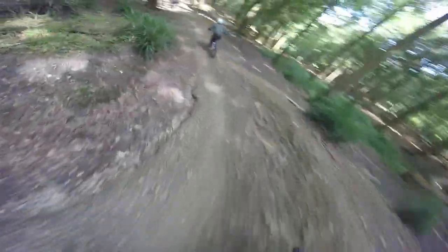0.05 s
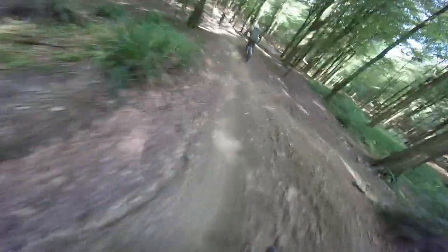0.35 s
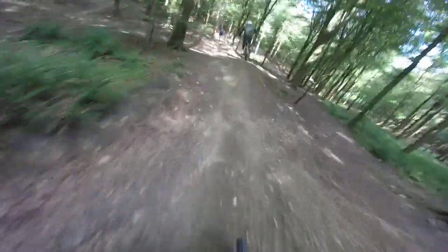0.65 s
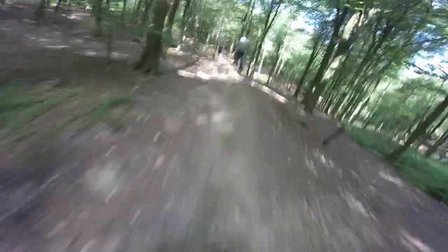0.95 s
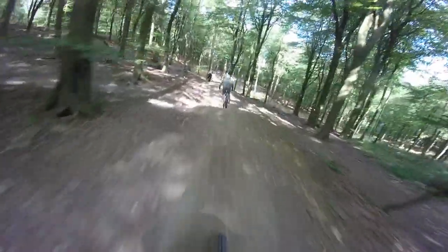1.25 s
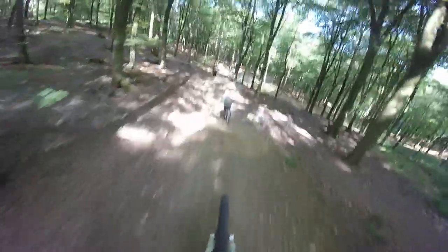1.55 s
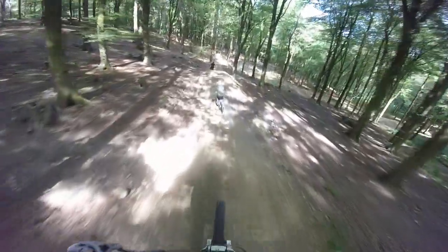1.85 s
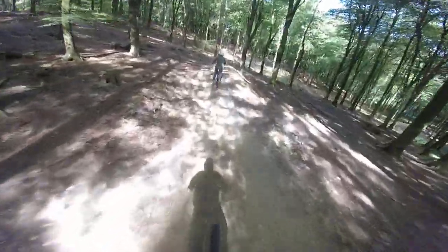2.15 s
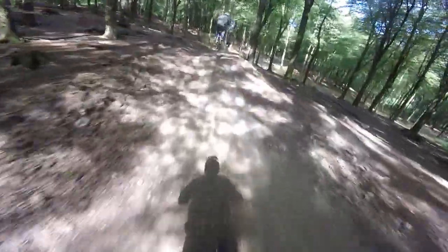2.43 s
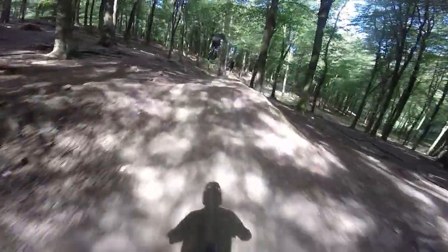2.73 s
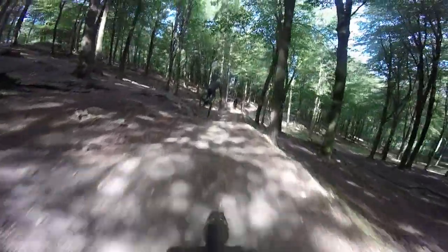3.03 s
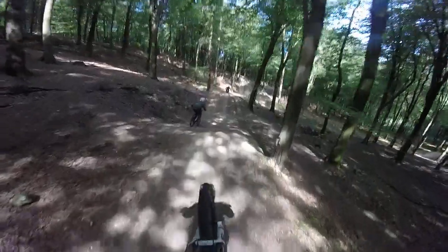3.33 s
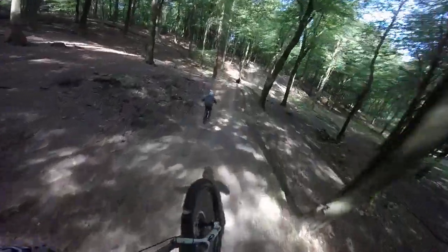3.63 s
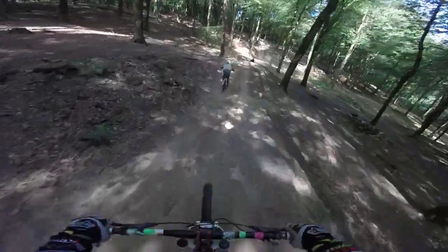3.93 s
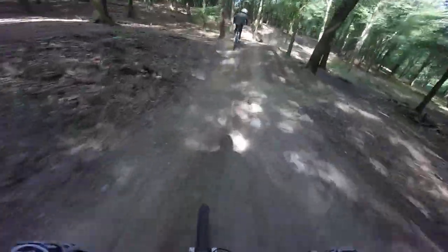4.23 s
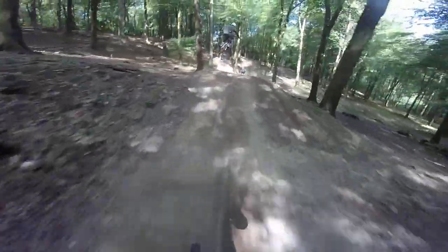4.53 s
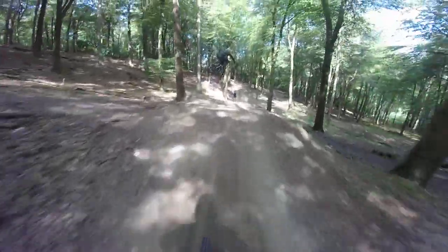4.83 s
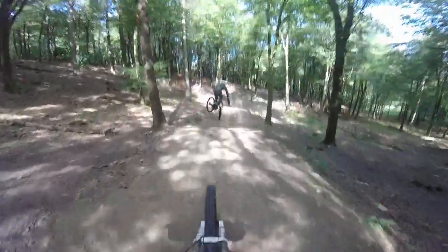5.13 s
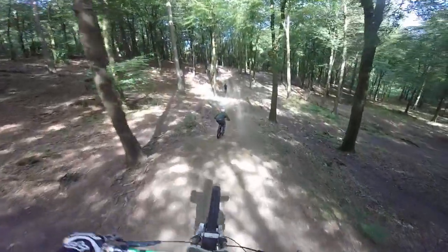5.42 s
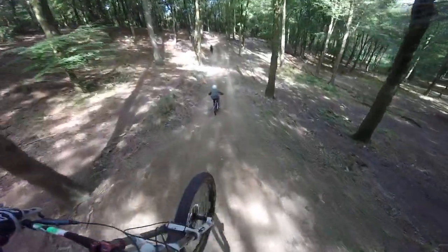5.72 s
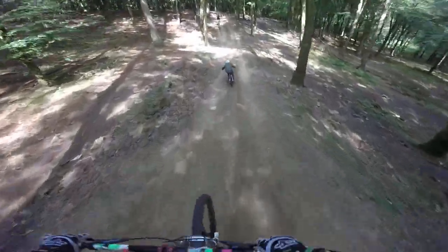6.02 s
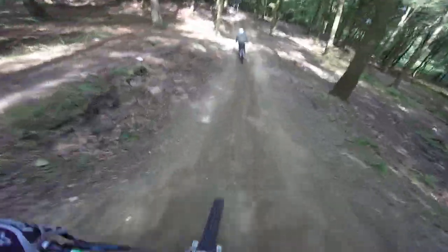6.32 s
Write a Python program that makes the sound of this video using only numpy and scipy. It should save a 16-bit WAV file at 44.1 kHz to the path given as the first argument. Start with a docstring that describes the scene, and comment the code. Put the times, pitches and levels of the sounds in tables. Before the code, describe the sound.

A mountain bike runs along a dirt trail, heard close from a microphone on the rider. Air streams past throughout, with a low rumble on rough ground, tyres rushing over packed dirt, and chain and cables clacking irregularly against the frame. The opening is busy with rattles, and a bump brings a crunch and thump at about 1 second. Near 1.6 seconds the bike takes off and the tyres and rumble ease, leaving wind and scattered clicks. It lands around 2.3 seconds, with a loud, hollow knock and thud at 2.5. A second takeoff at 3.3 seconds gives a smaller thump, then a quieter stretch until a crunching, rattling landing at about 4.2. The tyre rush swells into a third jump at 5.2 seconds, falls away in the air, and returns near 6.3 with a thump, crunching dirt and hard clatter.

```python
"""Mountain bike on three dirt jumps.

Heard from a camera worn by the rider. Air streams past; rough ground and landings shake the camera
into a low rumble. The tyres rush over packed dirt, crunch on loose patches and fall quiet in the air.
Chain and cables clack against the frame on the bumps, and the first landing gives a loud knock."""
import sys
import numpy as np
from scipy import signal
from scipy.fft import rfft, irfft, next_fast_len
from scipy.io import wavfile
from scipy.ndimage import uniform_filter1d, map_coordinates

SR = 44100
rng = np.random.default_rng(int(sys.argv[2]) if len(sys.argv) > 2 else 0)


def log_audio(samples):
    """Write samples as a 16-bit WAV file to the path given in sys.argv[1]."""
    # one column per channel
    frames = np.atleast_2d(samples).T
    # limit to full scale, then quantise
    limited = np.clip(frames, -1, 1)
    pcm = np.round(limited * 32767).astype(np.int16)
    wavfile.write(sys.argv[1], SR, pcm)


N = 285327


def amp(db):
    """Decibels to gain."""
    return 10 ** (np.asarray(db) / 20)


def unit_rms(x):
    """x scaled to rms 1."""
    return x / np.sqrt(np.mean(x ** 2) + 1e-20)


def power_sum(*gains):
    """Unrelated contributions add in power."""
    return np.sqrt(sum(gain ** 2 for gain in gains))


def curve(rows):
    """Time-value rows interpolated to every sample."""
    return np.interp(np.arange(N) / SR, *np.transpose(rows))


def swell(centre_s, sigma_s):
    """Gaussian bell of height 1."""
    return np.exp(-.5 * ((np.arange(N) / SR - centre_s) / sigma_s) ** 2)


def wobble(knots_per_s):
    """Smooth random curve."""
    knots = rng.standard_normal(int(N * knots_per_s / SR) + 4)
    return map_coordinates(knots, [np.arange(N) * knots_per_s / SR])


def peaks_db(hz, resonances):
    """Gain of bell-shaped peaks or dips."""
    return sum(db * np.exp(-.5 * ((hz - centre) / width) ** 2) for centre, width, db in resonances)


def colour_db(hz, spectrum, resonances=()):
    """Spectrum interpolated in log frequency, plus resonances."""
    knot_hz, db = np.transpose(spectrum)
    return np.interp(np.log(hz + 1), np.log(knot_hz), db) + peaks_db(hz, resonances)


def filtered(x, response):
    """x through a frequency response."""
    size = next_fast_len(N + SR // 2)
    return irfft(rfft(x, size) * response(np.fft.rfftfreq(size, 1 / SR)), size)[:N]


def minimum_phase(gain_db):
    """Causal frequency response of a body with this gain."""
    cepstrum = irfft(np.log(amp(gain_db)))
    half = len(cepstrum) // 2
    cepstrum[1:half] *= 2
    cepstrum[half + 1:] = 0
    return np.exp(rfft(cepstrum))


def rush(spectrum, resonances=(), grain_db=0):
    """Coloured noise of rms 1; grain_db breaks it into tiny uneven bursts."""
    drive = rng.standard_normal(N) * amp(grain_db * wobble(900))
    return unit_rms(filtered(drive, lambda hz: amp(colour_db(hz, spectrum, resonances))))


def add_centred(track, centre_s, sound):
    """Mix in a sound with its middle at centre_s."""
    at = round(centre_s * SR) + np.arange(len(sound)) - len(sound) // 2
    inside = (at >= 0) & (at < N)
    track[at[inside]] += sound[inside]


def impact(bounce_s, body_db, vary_db, scrape_db, scrape_t60_s, brush_db, brush_t60_s, rub_cutoff_hz):
    """A brush, a contact at mid-buffer, rebounds and a scrape ring a body; energy of 10 ms at rms 1."""
    size, bounces = 4096, 4
    t, hz = (np.arange(size) - size // 2) / SR, np.fft.rfftfreq(size, 1 / SR)
    bounce_s = np.clip(bounce_s, .0005, .02)
    lead_db = brush_db + 60 * t / brush_t60_s
    tail_db = -60 * t / (scrape_t60_s + 2 * bounce_s)
    rubbing = amp(np.where(t < 0, lead_db, tail_db))
    friction = irfft(rfft(rng.standard_normal(size) * rubbing) / np.hypot(1, (hz / rub_cutoff_hz) ** 2))
    force = amp(scrape_db) * friction / np.linalg.norm(rubbing)
    force[size // 2] += 1
    lag = (np.arange(bounces) + rng.uniform(.2, 1, bounces)) / bounces
    rebounds = amp(-6 - .68 * lag + 2.3 * rng.standard_normal(bounces)) * rng.choice([-1, 1], bounces)
    force[size // 2 + (lag * bounce_s * SR).astype(int)] += rebounds
    # each struck spot favours other frequencies
    spot_db = vary_db * np.interp(hz, np.linspace(0, SR / 2, 48), rng.standard_normal(48))
    sound = irfft(rfft(force) * minimum_phase(body_db(hz) + spot_db))
    return sound / np.linalg.norm(sound) * np.sqrt(SR / 100)


# Air stream strength: time_s, relative_db
AIR_LEVEL = [(0.0, -55), (0.49, -53.5), (0.7, -53.5), (1.17, -52.5), (1.67, -57), (1.98, -57.5),
             (2.34, -48.5), (2.52, -50), (3.77, -56.5), (3.96, -54), (4.18, -50.5), (4.81, -51.5),
             (5.1, -52.5), (5.93, -54), (6.47, -45)]
# Air stream spectrum: freq_hz, gain_db
AIR_SPECTRUM = [(50, -18.5), (70, 11.5), (100, 2), (170, -3.5), (260, -3.5), (320, 0), (400, -8),
                (500, -9.5), (650, -15), (1000, -17.5), (2000, -11.5), (6000, -47)]


def wind():
    """Air streams past the rider in small eddies."""
    eddies_db = 2.4 * wobble(24)
    return amp(curve(AIR_LEVEL) + 4 + eddies_db) * rush(AIR_SPECTRUM)


# Jumps: takeoff_s, touchdown_s, lip_rush_db, landing_rush_db, kick_shake_db, landing_shake_db
JUMPS = [(1.58, 2.335, -43.5, -39.5, -38.5, -21.5), (3.28, 4.143, -43, -41, -22.5, -18.5),
         (5.227, 6.264, -39.5, -36, -31, -23)]
UNLOAD_S, BITE_S = .035, .035


def grounded():
    """1 with the wheels on the dirt, 0 in flight."""
    t = np.arange(N) / SR
    step = lambda u: .5 + .5 * np.tanh(u / 2)
    return 1 - sum(step((t - off_s) / UNLOAD_S) * step((down_s - t) / BITE_S)
                   for off_s, down_s, *_ in JUMPS)


# Trail roughness: time_s, shake_db
TRAIL = [(0, -30), (.4, -25), (.55, -29), (.98, -26), (1.07, -18), (1.2, -34), (1.55, -37), (2.66, -28),
         (2.85, -45), (3.2, -37), (4.45, -32), (5.2, -36.5), (6.47, -25)]
FLIGHT_SHAKE_DB = -48


def shake():
    """Shake strength: the trail, the rear wheel kicking off each lip, the suspension bottoming."""
    kicks = [amp(db) * swell(off_s + .11, sigma_s=.05) for off_s, *_, db, _ in JUMPS]
    landings = [amp(db) * swell(down_s + .145, sigma_s=.055) for _, down_s, *_, db in JUMPS]
    return power_sum(amp(FLIGHT_SHAKE_DB), grounded() * amp(curve(TRAIL)), *kicks, *landings)


# Camera mount sway: freq_hz, gain_db
RUMBLE_SPECTRUM = [(10, -12.5), (20, -7.5), (32, 0.5), (41, -3), (50, -13.5), (68, -12), (82, -24),
                   (105, -35.5), (160, -35.5), (400, -104)]


def rumble():
    """Bumps and buffeting shake the camera on its mount."""
    sway = rush(RUMBLE_SPECTRUM)
    local_rms = np.sqrt(uniform_filter1d(np.abs(signal.hilbert(sway)) ** 2 / 2, size=3000))
    return shake() * amp(.9 * wobble(18) - .07) * sway / local_rms


# Hard bumps: start_s, peak_db, pitch_hz
THUMPS = [(1.046, -21, 69.3), (2.496, -21.5, 60.4), (3.359, -29.5, 61.6), (4.274, -22, 66),
          (6.357, -23.5, 68)]


def thumps(rise_s=.021):
    """Each hard bump swings the mount for a few cycles as the suspension takes the load."""
    track = np.zeros(N)
    for start_s, peak_db, pitch_hz in THUMPS:
        t = np.maximum(np.arange(N) / SR - start_s, 0)
        envelope = t / rise_s * np.exp(1 - t / rise_s)
        track += amp(peak_db) * envelope * np.sin(2 * np.pi * pitch_hz * t)
    return track


# Loose dirt patches: centre_s, level_db, sigma_s
LOOSE_PATCHES = [(.45, -62, 0.021), (1.021, -41, 0.011), (1.59, -49, 0.032), (2.41, -44.5, 0.02),
                 (2.91, -47, 0.036), (4.22, -44, 0.041), (4.92, -50.5, 0.047), (5.5, -52.5, 0.075),
                 (6.29, -47, 0.02), (6.363, -36, 0.017), (6.44, -40, 0.013)]
# Cracking grains: freq_hz, gain_db
CRUNCH_SPECTRUM = [(500, -22), (1300, 3.5), (2000, 3), (3700, -7), (6000, -11), (9000, -28), (15000, -44)]


def crunch(grains_per_s=1800):
    """Crumbs and stones crack under the tread: many tiny grains, a few large ones."""
    envelope = sum(amp(db) * swell(centre_s, sigma_s) for centre_s, db, sigma_s in LOOSE_PATCHES)
    grains = (rng.random(N) < grains_per_s / SR) * rng.choice([-1, 1], N)
    sizes = amp(4.1 * np.minimum(rng.exponential(size=N), 5))
    cracks = filtered(grains * sizes, lambda hz: minimum_phase(colour_db(hz, CRUNCH_SPECTRUM)))
    return envelope * unit_rms(cracks)


def tyre_load(roll_db=-46, spin_db=-3, shed_db=-11, shed_s=.42):
    """Tyre rush strength: whirr, rolling, pressing into each ramp, shedding dirt, squashing on landing."""
    t, contact = np.arange(N) / SR, grounded()
    gains = [amp(curve(AIR_LEVEL) + spin_db), contact * amp(roll_db)]
    for off_s, down_s, lip_db, landing_db, _, _ in JUMPS:
        ramp = contact * swell(off_s - .115, sigma_s=.16)
        shed = amp(shed_db) * np.exp(np.minimum((t - off_s) / UNLOAD_S, (off_s - t) / shed_s))
        squash = swell(down_s + .084, sigma_s=.069)
        gains += [amp(lip_db) * power_sum(ramp, shed), amp(landing_db) * squash]
    return power_sum(*gains)


# Knobs on packed dirt: freq_hz, gain_db
TYRE_SPECTRUM = [(250, -36), (700, -23.5), (1050, -25.5), (1270, -4), (1750, -9), (2080, -22), (2400, -11),
                 (2800, -19.5), (3200, -13.5), (3950, -14.5), (4350, -25.5), (6500, -40), (14000, -75)]
# Camera housing resonances: centre_hz, width_hz, gain_db
HOUSING_PEAKS = [(1633, 77, 10), (3113, 187, 10)]
# Grit hiss: freq_hz, gain_db
GRIT_SPECTRUM = [(1500, 6.5), (4000, 3.5), (5500, -2), (7000, -9), (8000, -9.5), (10000, -14.5),
                 (14500, -23), (15600, -42)]


def tyres(load_swing_db=2.7, skip_shake_db=-18.5, grit_db=-58.5, jolt_grit_db=-34.5):
    """Knobs scrub the dirt under a varying load and skip on rough ground; jolts throw up hissing grit."""
    bumps, jolt = wobble(35), shake()
    skip_db = 1.2 * np.minimum(jolt / amp(skip_shake_db), 1)
    flutter = amp(load_swing_db * bumps + skip_db * (bumps - 1))
    scrub = tyre_load() * flutter * rush(TYRE_SPECTRUM, HOUSING_PEAKS, grain_db=3.5)
    grit_gain = power_sum(amp(grit_db), amp(jolt_grit_db) * jolt) * amp(.5 * bumps)
    return scrub + grit_gain * rush(GRIT_SPECTRUM, grain_db=2.5)


# Deep compressions: time_s, level_db
KNOCKS = [(2.4978, -17)]
# Crack of a knock: freq_hz, gain_db
KNOCK_SPECTRUM = [(120, -38), (380, -8.5), (800, -20.5), (1100, -17.5), (1500, -7), (2000, -10.5),
                  (2900, -17.5), (4000, -18.5), (4500, -42), (5100, -17), (6000, -37), (10000, -40.5),
                  (15000, -56)]
# Fork modes: pitch_hz, relative_db, t60_s
FORK_MODES = [(375, -11, 0.096), (514, -24, 0.047), (714, -23, 0.13), (1020, -33, .05), (1287, 4.5, 0.023),
              (1574, -0.5, 0.036), (1633, 3.5, 0.038), (2620, -4, 0.031), (2950, -10, 0.036),
              (5200, -12, 0.017)]


def knocks(attack_s=.0017):
    """A deep compression gives a hard crack and a hollow ring of the fork."""
    track = np.zeros(N)
    t = np.maximum(np.arange(-SR // 5, SR // 5), 0) / SR
    for time_s, level_db in KNOCKS:
        crack = impact(.005, lambda hz: colour_db(hz, KNOCK_SPECTRUM), vary_db=.5, scrape_db=2.5,
                       scrape_t60_s=.059, brush_db=-32, brush_t60_s=.005, rub_cutoff_hz=3500)
        fork = sum(amp(db - 60 * t / t60_s) * np.sin(2 * np.pi * hz * t) for hz, db, t60_s in FORK_MODES)
        add_centred(track, time_s, amp(level_db) * crack)
        add_centred(track, time_s, amp(level_db + 3) * fork * (1 - np.exp(-t / attack_s)))
    return track


def chatter(max_per_s=13, full_shake_db=-28, level_db=-45.5, count=64):
    """Light chance contacts of the chain, denser and harder with more shake; rows as in CLACKS."""
    jitter = rng.uniform(0, 1, count)
    scatter_db, tilts = rng.standard_normal((count, 2)).T
    agitation = np.clip(grounded() * shake() / amp(full_shake_db), 1e-6, 1)
    onsets = np.searchsorted(np.cumsum(max_per_s * agitation) / SR, np.arange(count) + jitter)
    return [(i / SR, level_db + db + 10 * np.log10(agitation[i]), 2.9 * tilt - 1.5)
            for i, db, tilt in zip(onsets, scatter_db, tilts) if i < N]


# Prominent chain and cable hits: time_s, relative_db, tilt_db_per_octave
CLACKS = [(0.064, -33.5, 0.5), (.092, -45, 10), (.1094, -39, 0), (.1185, -41.5, 1), (0.1366, -34.5, -3.5),
          (.181, -39.5, 11), (.249, -32.5, 0.5), (0.261, -26, -5), (0.2992, -28, -1.5), (0.3354, -36, 4.5),
          (0.343, -43, 7), (0.3762, -38, -5), (.4, -37.5, -0.5), (.42, -40, 11), (0.425, -34.5, -7.5),
          (0.4363, -44, 1), (.4637, -28, -2.5), (.532, -39, 6.5), (0.5698, -36, 1), (0.6353, -35, -2),
          (.67, -35, 1.5), (.76, -45.5, 0.5), (.838, -34, 1), (.876, -39.5, 2), (.9015, -35.5, 2),
          (0.934, -29.5, -2), (1.0106, -38.5, 11), (1.0332, -34, 4), (1.0537, -24, -1.5), (1.072, -33, 7),
          (1.113, -34.5, -0.5), (1.128, -41, 3.5), (1.147, -39.5, 1), (1.4981, -31, 5.5),
          (1.5043, -35.5, -1.5), (1.5586, -34, -2), (1.6674, -34.5, 4), (1.7288, -46.5, -2),
          (1.7773, -43.5, -3.5), (1.8178, -43, 6), (1.8332, -44, 3), (1.886, -43, 0), (2.004, -42.5, 5),
          (2.058, -36, 1.5), (2.1367, -33, 4), (2.351, -31.5, 5.5), (2.394, -33.5, -1.5), (2.4027, -32, 2),
          (2.4422, -35, 8), (2.4662, -32.5, 3), (2.4866, -26, -3.5), (2.571, -35.5, -0.5),
          (2.6095, -37, 0.5), (2.661, -32.5, 0), (2.7163, -36, -2.5), (3.131, -37, 7), (3.2045, -39, -4),
          (3.248, -41.5, -2.5), (3.2743, -32.5, 0.5), (3.313, -36.5, -15), (3.329, -39.5, 4),
          (3.3568, -33.5, 0), (3.4032, -40.5, 2), (3.519, -46.5, 3), (3.5572, -44, -6.5), (3.663, -34, 2),
          (3.673, -39, 0.5), (3.7442, -44.5, 4), (4.0223, -42, 1.5), (4.1672, -40, 6.5),
          (4.2222, -32.5, -4), (4.2499, -34.5, 3.5), (4.2906, -29.5, 4.5), (4.2939, -27.5, -1.5),
          (4.3018, -29, -6.5), (4.3637, -37, -7.5), (4.519, -35, 2), (4.7927, -38.5, 1),
          (4.973, -44.5, 4.5), (5.2474, -37, -1), (5.319, -34, 1.5), (5.354, -39, -8), (5.3713, -39, 2.5),
          (5.4348, -42.5, 0.5), (5.536, -34.5, 3.5), (5.737, -44, -1), (6.1573, -48, 0.5),
          (6.259, -36.5, 4), (6.3066, -27, -3), (6.328, -29.5, -8.5), (6.349, -33, 3.5), (6.362, -33, -4),
          (6.3763, -42.5, 16.5), (6.395, -28.5, -3.5)]
# Clack body: freq_hz, gain_db
CLACK_SPECTRUM = [(150, -22), (380, -12), (750, -19), (1200, -10), (1750, -3), (3300, -0.5), (4400, -2),
                  (6100, -10.5), (7000, -21), (8500, -20.5), (11500, -31.5), (15000, -45)]
# Frame resonances: centre_hz, width_hz, gain_db
FRAME_PEAKS = [(2074, 48, 6.1), (2442, 89, 6.6), (3392, 210, 4.54), (4980, 106, 2.7), (7700, 290, 5.4)]
# Chainstay colour under heavy slaps: centre_hz, width_hz, gain_db
CHAINSTAY_PEAKS = [(1927, 140, 7), (2600, 110, 4), (1000, 270, -3)]
# Metal tick: freq_hz, gain_db
TICK_SPECTRUM = [(1500, -31), (4000, 9), (6000, 4.5), (7100, -7), (8000, -9), (11500, 0.5), (13000, -12),
                 (14500, -14), (15600, -20)]


def rattle():
    """Chain and cables hit the frame: a thin metal tick, then the clack."""
    track = np.zeros(N)
    for time_s, db, tilt in CLACKS + chatter():
        heavy = np.clip((db + 33.5) / 8, 0, 1)
        bounce_s = .0033 * amp(.4 * tilt)  # brighter, looser hits rattle longer
        body_db = lambda hz: (colour_db(hz, CLACK_SPECTRUM, FRAME_PEAKS)
                              + heavy * peaks_db(hz, CHAINSTAY_PEAKS)
                              + tilt * np.log2(np.clip(hz, 1500, 7000) / 3000))
        clack = impact(bounce_s, body_db, vary_db=2, scrape_db=1,
                       scrape_t60_s=.032, brush_db=-5, brush_t60_s=.018, rub_cutoff_hz=5270)
        tick = impact(.001, lambda hz: colour_db(hz, TICK_SPECTRUM), vary_db=1.5, scrape_db=1,
                      scrape_t60_s=.004, brush_db=-10, brush_t60_s=.0045, rub_cutoff_hz=12000)
        add_centred(track, time_s + .0003, amp(db + 1.5) * clack)
        add_centred(track, time_s - .0004, amp(db - 21 + .9 * tilt) * tick)
    return track


def scene():
    """Mono mix; all sources ride along with the microphone."""
    return (rumble() + wind() + tyres() + crunch() + thumps() + knocks() + rattle())[None]


# Dips of the microphone in its housing: centre_hz, width_hz, gain_db
MIC_DIPS = [(2060, 78, -6.5), (3507, 25, -7), (4700, 93, -3), (5410, 160, -4)]
CEILING, BAND_LIMIT_HZ = .52, 15600


def record(dry):
    """The housing hollows the sound, the loudest peak saturates, and the top treble is cut."""
    hollow = filtered(dry[0], lambda hz: minimum_phase(peaks_db(hz, MIC_DIPS)))
    saturated = hollow / (1 + np.abs(hollow / CEILING) ** 6) ** (1 / 6)
    return filtered(saturated, lambda hz: hz < BAND_LIMIT_HZ)[None]


dry = scene()
out = record(dry)
log_audio(out)
```